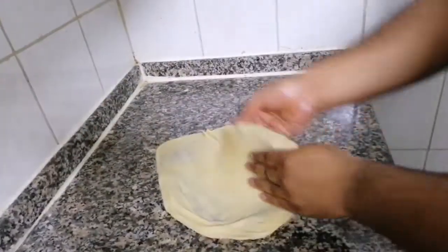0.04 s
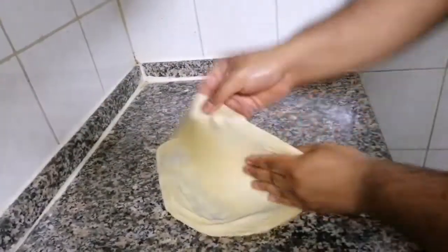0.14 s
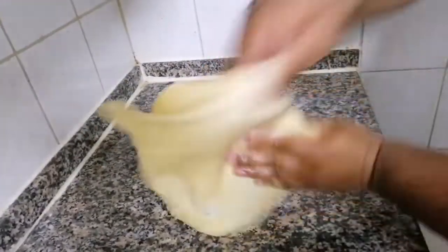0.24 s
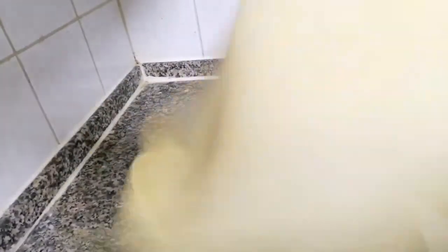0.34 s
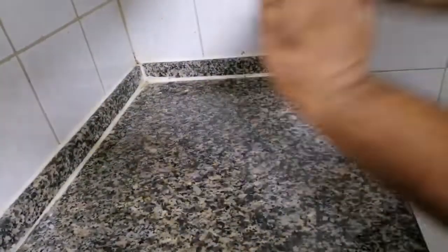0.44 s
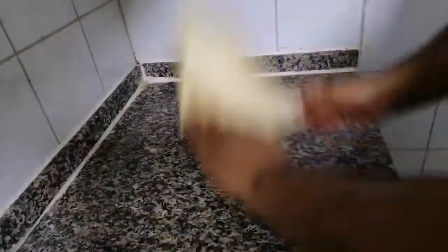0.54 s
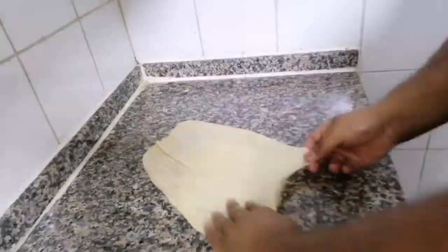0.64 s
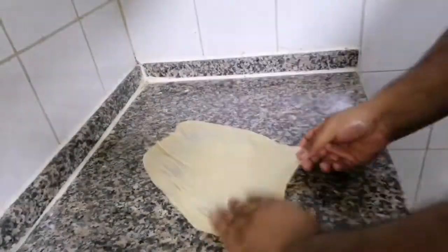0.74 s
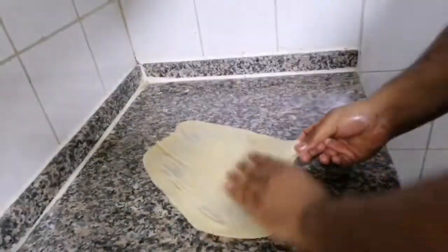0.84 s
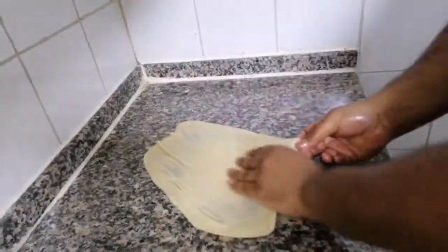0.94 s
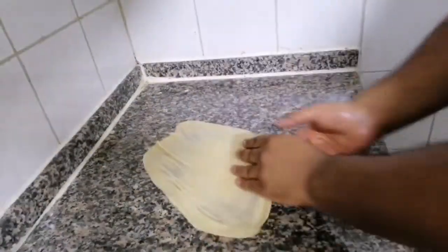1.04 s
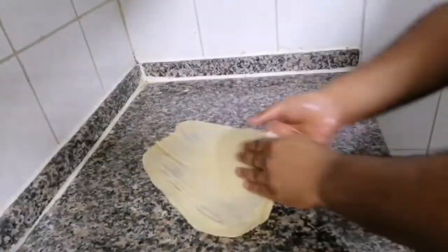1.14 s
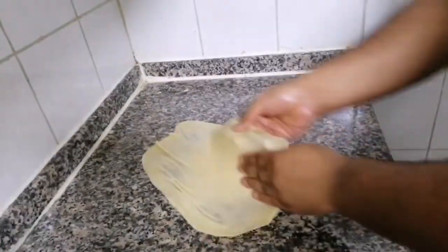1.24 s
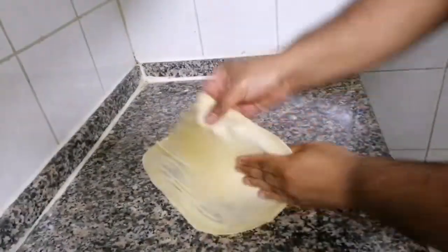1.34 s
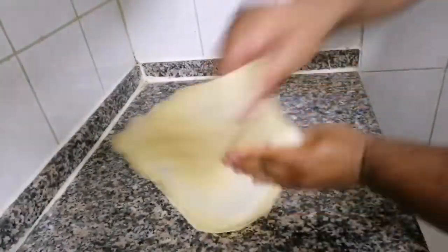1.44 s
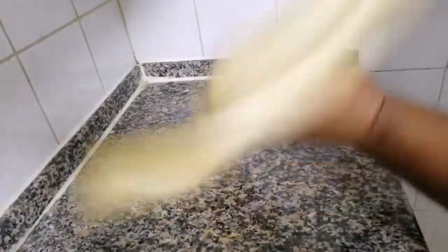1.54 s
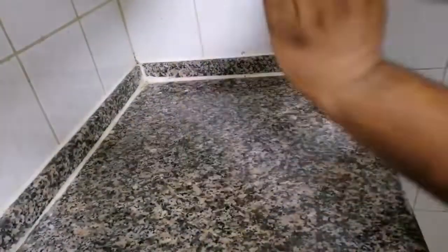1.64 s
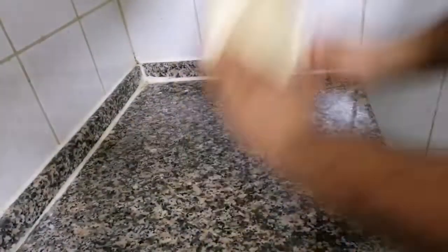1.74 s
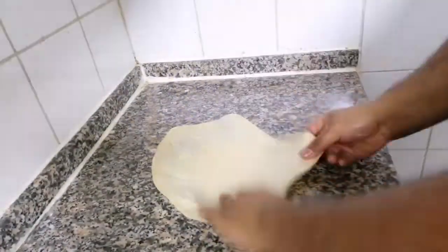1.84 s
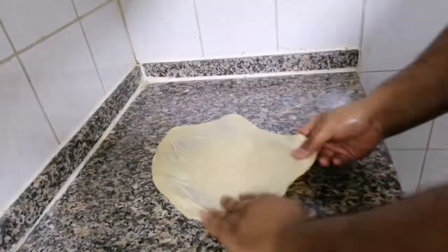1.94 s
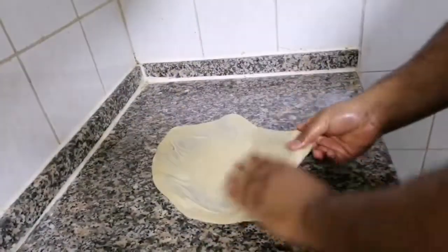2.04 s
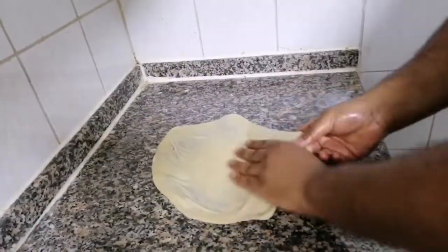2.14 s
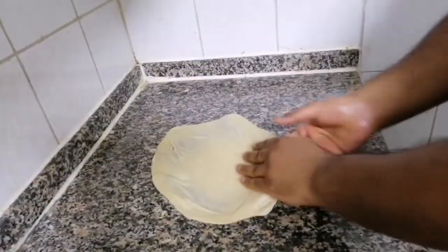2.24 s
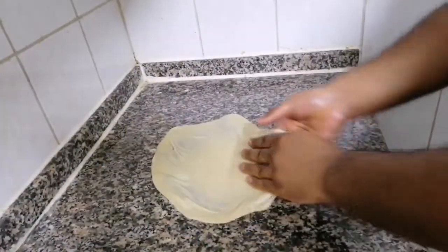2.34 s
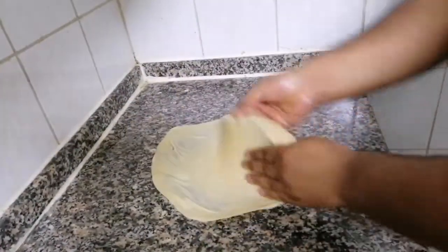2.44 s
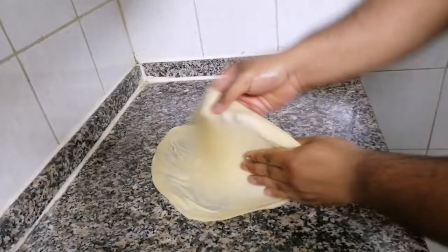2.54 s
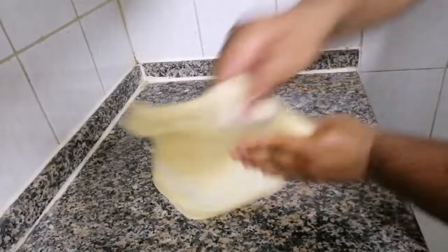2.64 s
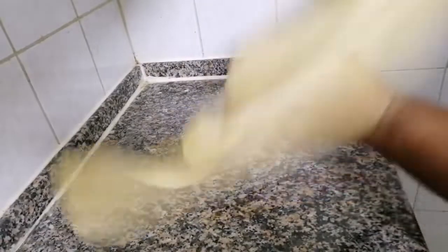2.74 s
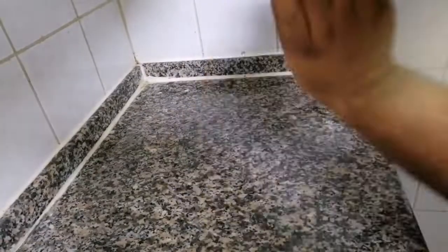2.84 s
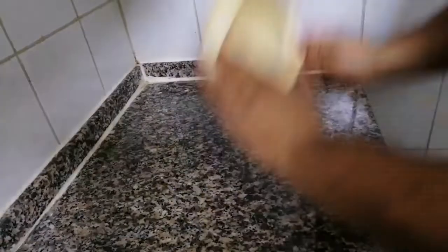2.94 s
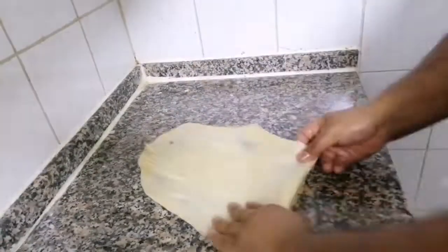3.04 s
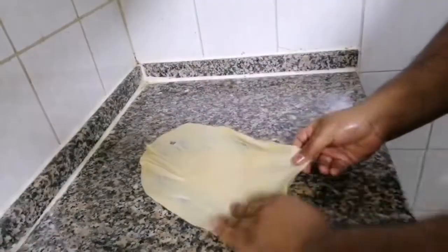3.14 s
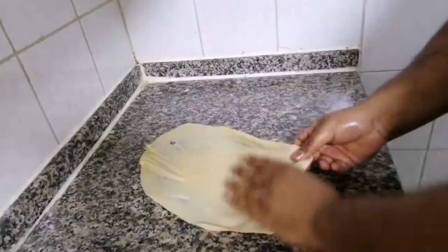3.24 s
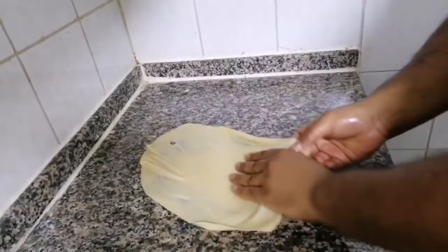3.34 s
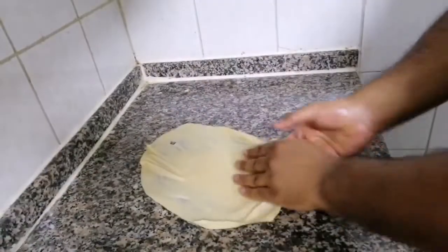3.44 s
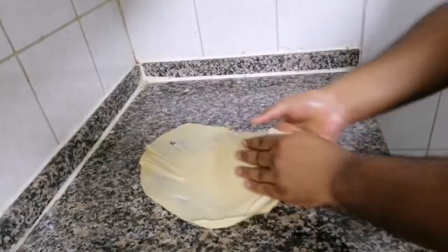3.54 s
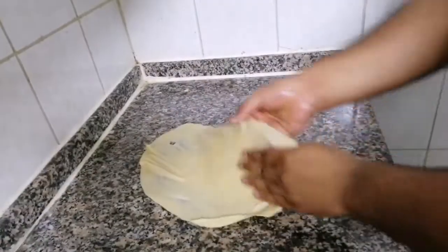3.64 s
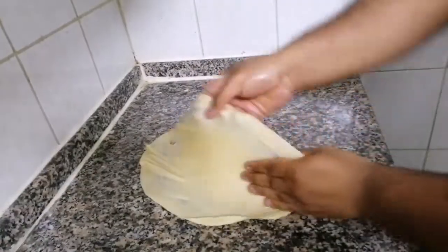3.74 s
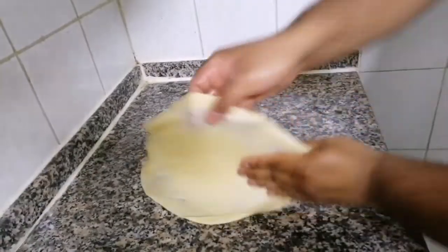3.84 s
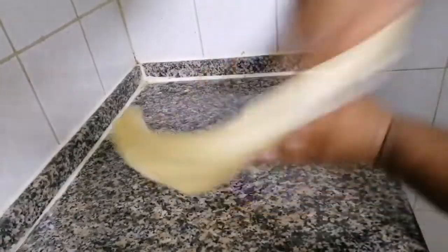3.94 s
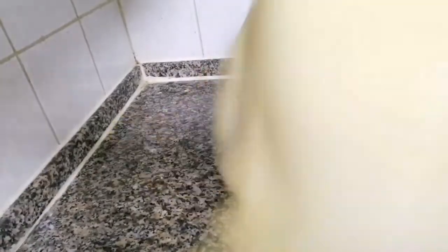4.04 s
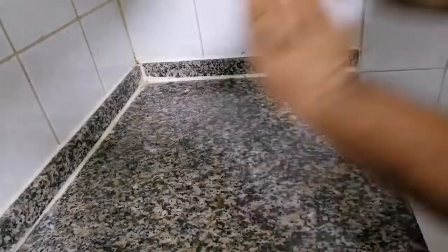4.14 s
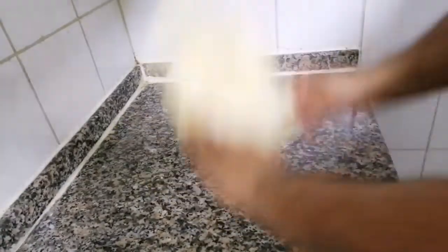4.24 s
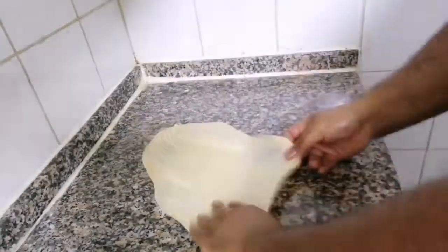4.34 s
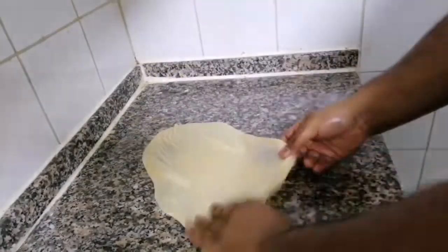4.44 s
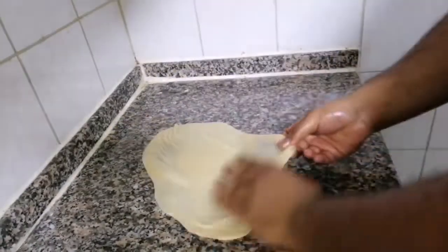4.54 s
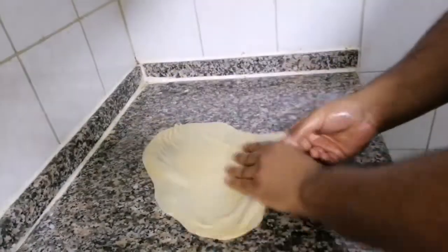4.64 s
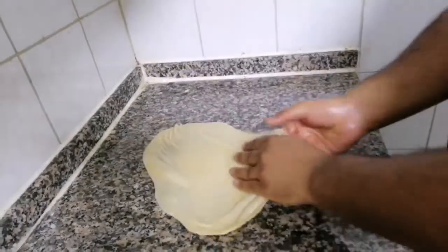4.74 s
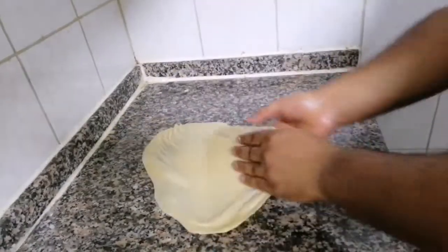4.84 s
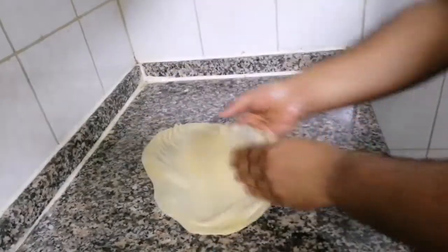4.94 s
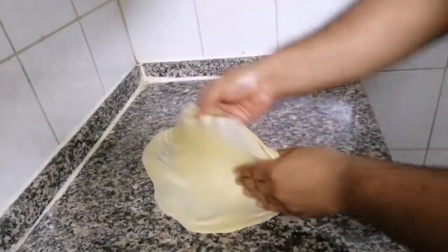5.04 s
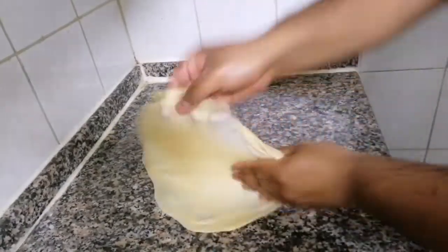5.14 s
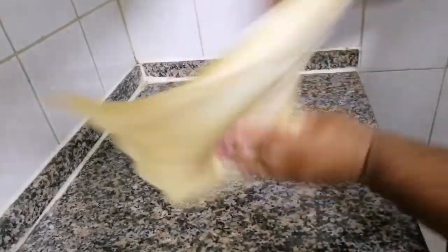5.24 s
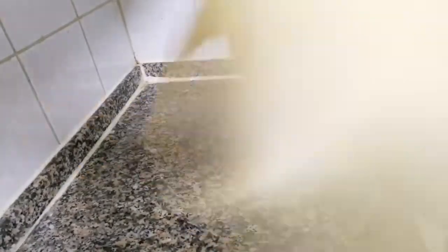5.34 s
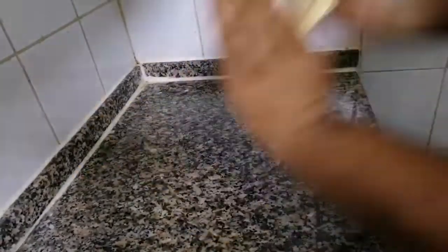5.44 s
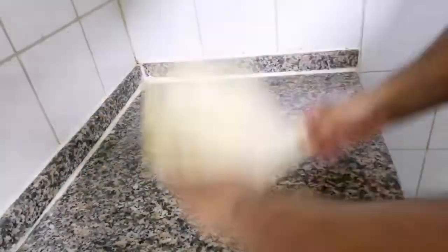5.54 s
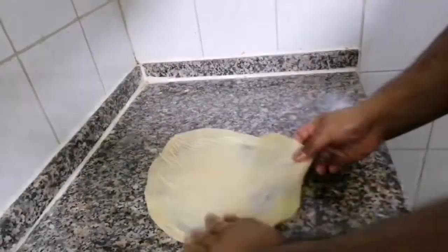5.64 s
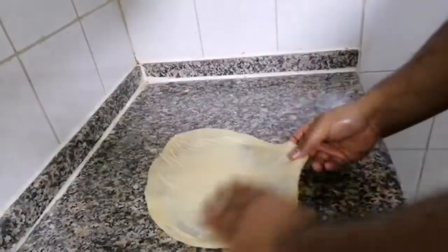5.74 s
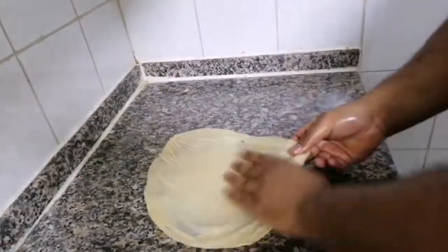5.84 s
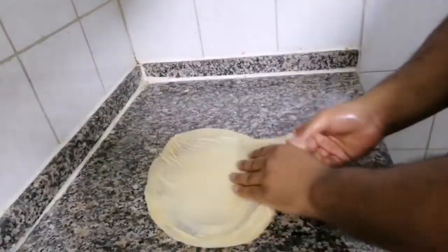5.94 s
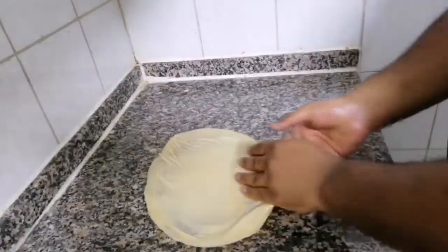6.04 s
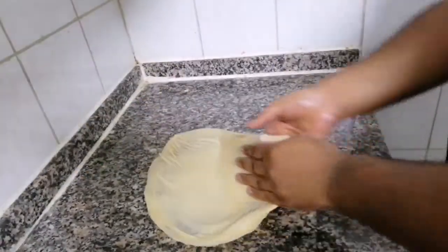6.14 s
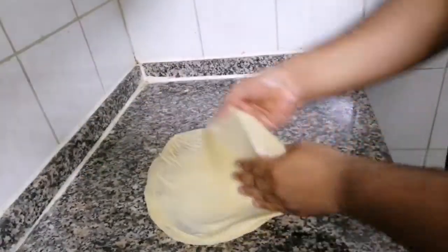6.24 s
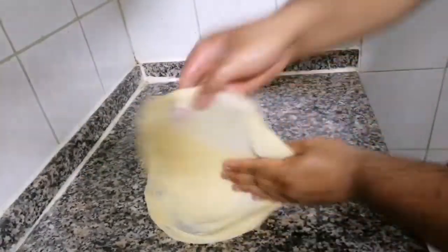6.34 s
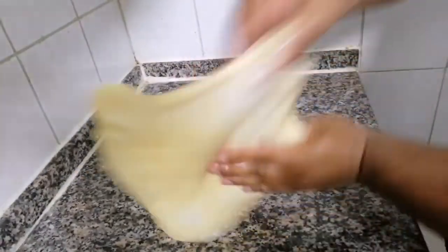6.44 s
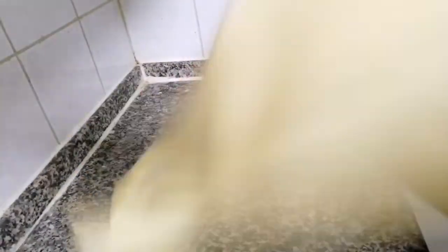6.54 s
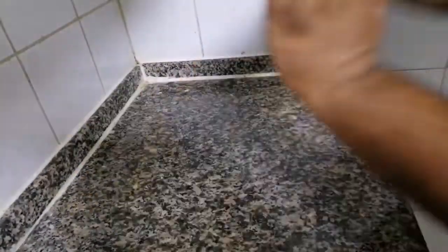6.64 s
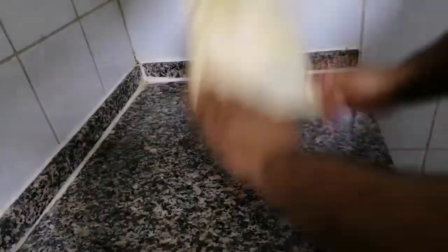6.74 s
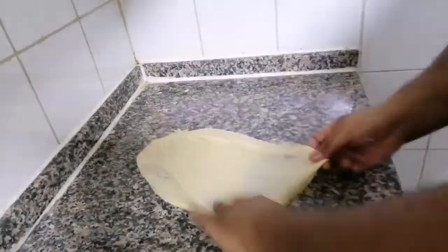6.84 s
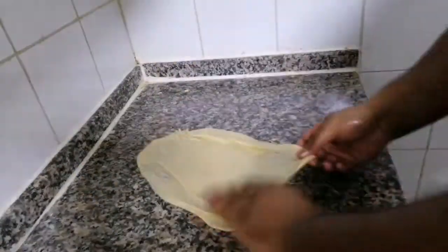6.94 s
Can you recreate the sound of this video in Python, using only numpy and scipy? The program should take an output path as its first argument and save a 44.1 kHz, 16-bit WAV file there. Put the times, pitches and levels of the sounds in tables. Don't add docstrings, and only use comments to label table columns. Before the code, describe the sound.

A thin sheet of soft dough is slapped six times onto a stone counter, loud wet cracks ringing briefly in a tiled kitchen.

```python
import sys
import numpy as np
from scipy import signal
from scipy.fft import rfft, irfft, next_fast_len
from scipy.io import wavfile
from scipy.ndimage import uniform_filter1d, map_coordinates

SR = 44100
rng = np.random.default_rng(int(sys.argv[2]) if len(sys.argv) > 2 else 0)


def voltage_ratio(decibels):
    exponent = np.asarray(decibels, float) / 20
    return 10 ** exponent


def master(y):
    cut = np.clip(np.atleast_2d(y).T, -1, 1)
    pcm = np.round(cut * 32767)
    wavfile.write(sys.argv[1], SR, pcm.astype(np.int16))


N = 308259


def along(points, hz):
    f, v = np.transpose(points)
    return np.interp(np.log(hz + 1), np.log(f + 1), v)


def unit(x):
    return x / np.sqrt(np.mean(x ** 2) + 1e-20)


def curves(rows):
    s, *cols = np.transpose(rows)
    return [np.interp(np.arange(N) / SR, s, c) for c in cols]


def wobble(rate):
    knots = rng.standard_normal(int(N * rate / SR) + 4)
    return map_coordinates(knots, [np.arange(N) * rate / SR])


def filtered(x, response):
    n = x.shape[-1]
    m = next_fast_len(n + 8192)
    return irfft(rfft(x, m) * response(np.fft.rfftfreq(m, 1 / SR)), m)[..., :n]


def peak(f, hz, width):
    return 1j * f * width / (hz * hz - f * f + 1j * f * width)


def add(out, s, x):
    part = out[:, round(s * SR):][:, :x.shape[1]]
    part += x[:, :part.shape[1]]


# frequency in Hz, left-right correlation.
ALIKE = [(60, 0.93), (130, 0.92), (290, 0.75), (640, 0.47), (1410, 0.02), (3100, 0.02), (6820, -0.01),
         (15000, -0.04)]
# frequency in Hz, left over right in dB.
LEAN = [(60, 7.0), (130, 7.5), (290, 5.0), (640, 4.0), (1410, 4.0), (3100, 4.0), (6820, 5.0), (15000, -1.0)]


def kitchen_noise(gain):
    turn = lambda f: np.arccos(np.clip(along(ALIKE, f), -1, 1)) / 2
    spread = lambda f: gain(f) * [np.cos(turn(f)), np.sin(turn(f))]
    common, difference = filtered(rng.standard_normal((2, N)), spread)
    pair = np.array([common + difference, common - difference])
    pair = filtered(pair, lambda f: voltage_ratio(along(LEAN, f) * np.array([[.5], [-.5]])))
    return pair / np.std(pair.mean(0))


# time in seconds, strength in dB.
STREET = [(0, -64), (.2, -61), (.36, -70), (.55, -59), (.95, -61), (1.27, -66.5), (1.46, -54), (1.76, -55),
          (2.4, -59.5), (2.95, -54.5), (3.56, -57), (4.15, -62), (4.72, -65), (4.82, -60.5), (5.5, -62),
          (6.02, -61.5), (6.3, -58), (6.99, -64)]
# frequency in Hz, density in dB per Hz.
RUMBLE = [(12, -40.5), (20, -7), (38, -12), (69, -8), (89, -3.5), (107, 2), (127, -7), (150, -12),
          (220, -22), (290, -53), (480, -120)]
# frequency in Hz, density in dB per Hz.
MURMUR = [(110, -27.5), (180, 1), (344, -11), (383, -17), (418, -6), (469, -10), (575, -4), (607, -18),
          (771, -22.5), (1500, -28.5), (1950, -61), (3300, -120)]
# frequency in Hz, width in Hz, level in dB.
HUMS = [(261.5, 20, -5.5), (417.4, 32, -9), (573.2, 2, -1)]
# time in seconds, level in dB.
DRONE = [
    (1.5, -89),
    (2.1, -70.5),
    (2.4, -82.5),
    (2.62, -64),
    (2.85, -73.5),
    (3.3, -80),
    (4.5, -94.5),
]
# frequency in Hz, density in dB per Hz.
HISS = [(410, -28.5), (700, -0.5), (1300, -9.5), (2070, -9), (4810, -16.5), (8390, -19.5), (9420, -17.5),
        (13700, -27.5), (15400, -30)]
MURMUR_DB, MURMUR_FOLLOWS = -69, 0.47
DRONE_HZ, HISS_DB_RMS = 255, -76.5


def air():
    street_db, = curves(STREET)
    rumble = voltage_ratio(street_db + 0.66 + 1.5 * wobble(9)) * kitchen_noise(lambda f: voltage_ratio(along(RUMBLE, f)))

    modes = lambda f: sum(voltage_ratio(db) * abs(peak(f, hz, width)) for hz, width, db in HUMS)
    swing_db = MURMUR_FOLLOWS * (street_db - street_db.mean())
    murmur_level = voltage_ratio(MURMUR_DB + swing_db + 0.36 * wobble(9.6))
    murmur = murmur_level * kitchen_noise(lambda f: voltage_ratio(along(MURMUR, f)) + modes(f))

    phase = 2 * np.pi * np.cumsum(DRONE_HZ + 3 * wobble(8.2)) / SR
    drone = voltage_ratio(curves(DRONE)[0] + 5.5 + 1.5 * wobble(7.9)) * np.sin(phase) * voltage_ratio([[3], [-4]])
    hiss = voltage_ratio(HISS_DB_RMS + 0.4 * wobble(1.8)) * kitchen_noise(lambda f: voltage_ratio(along(HISS, f)))
    return rumble + murmur + drone + hiss


# start in seconds, peak in dB, resonance in Hz, t60 in seconds, hiss in dB.
RATTLES = [(1.423, -56, 3070, .036, -2), (1.564, -51, 1530, 0.058, -10), (1.568, -54.5, 2640, 0.064, -11),
           (1.68, -62.5, 4000, .053, -10), (5.812, -46, 2370, 0.37, -3.5), (5.84, -52, 5030, 0.14, -11),
           (5.954, -51, 2210, 0.5, -16), (5.97, -44.5, 2390, 0.26, -8), (6.176, -42.5, 1990, 0.25, 3.5),
           (6.194, -43.5, 2510, 0.16, -6.5), (6.374, -57.5, 3000, .12, 2), (6.481, -57.5, 3500, 0.17, -7.5),
           (6.613, -65, 2980, 0.15, 2)]
# frequency in Hz, level in dB, t60 in seconds.
DISHES = [(1883, -0.5, 0.23), (2100, -13, 0.2), (2400, -4.5, 0.94), (2643, -13, 0.35), (2880, -7, 0.46),
          (3560, -10, 0.24), (5130, -12, 0.26), (7640, -16, 0.37)]
DISH_DB, FAR_T60_S = -9.5, .15
RISE_SHARE = 0.017


def crockery(t, hit_t60):
    ring = 0
    for hz, db, mode_t60 in DISHES:
        t60 = min(mode_t60, 1.04 * hit_t60)
        level = voltage_ratio(db + rng.normal(0, 2.8) - 60 * t / t60)
        ring = ring + level * np.sin(2 * np.pi * hz * t + rng.normal(0, 2.4, (2, 1)))
    return voltage_ratio(DISH_DB) * (1 - np.exp(-t / 0.0019)) * ring


def rattles():
    out, t = np.zeros((2, N)), np.arange(SR // 2) / SR
    for s, db, hz, t60, hiss_db in RATTLES:
        if t60 > FAR_T60_S:
            add(out, s, voltage_ratio(db) * crockery(t, t60))
        main = lambda f: peak(f, hz, 0.18 * hz) - voltage_ratio(-6.5) * peak(f, 2 * hz, 0.19 * hz)
        tones = lambda f: main(f) - voltage_ratio(-4.5) * peak(f, 460, 630)
        hiss = lambda f: voltage_ratio(hiss_db - 11.5) * peak(f, 3400, 8600) / (1 + (f / 11000) ** 6)
        noise = unit(filtered(rng.standard_normal((2, len(t))), lambda f: tones(f) + hiss(f)))
        swell = voltage_ratio(db - 4.0 - 60 * t / t60) * (1 - np.exp(-t / (RISE_SHARE * t60)))
        add(out, s, swell * noise * voltage_ratio([[2.2], [-2.2]]))
    return out


# time of the top in seconds, level in dB, rise in seconds.
PEEL = [(.22, -70.5, .13), (1.1, -82, 0.071), (1.441, -65, 0.085), (1.599, -77.5, 0.061),
        (2.28, -82.5, 0.058), (2.632, -65.5, 0.098), (3.878, -69.5, 0.11), (4.85, -81.5, 0.054),
        (5.192, -68.5, .078), (6.3, -71.5, 0.092), (6.46, -67, 0.074)]
# frequency in Hz, density in dB per Hz.
PEEL_TONE = [(410, -32.5), (700, -0.5), (1130, -9.5), (1250, 0), (1520, -9), (1710, -1.5), (2330, -1.5),
             (4340, -9), (9300, -11.5), (13900, -18), (15400, -28)]
FALL_SHARE, PEEL_FLAP_DB = 0.72, -5.5
RUSH_LEAD_S, RUSH_RISE_S = .008, .024
RUSH_DB, RUSH_FLAP_DB = -66, 1.15


def peel():
    s = np.arange(N) / SR
    strokes = [(at, db, rise, PEEL_FLAP_DB) for at, db, rise in PEEL]
    strokes += [(at - RUSH_LEAD_S, RUSH_DB, RUSH_RISE_S, RUSH_FLAP_DB) for at, *_ in LANDINGS]
    hiss_level, flap_level = np.zeros(N), np.zeros(N)
    for at, db, rise, flap_db in strokes:
        side = np.where(s < at, rise, FALL_SHARE * rise)
        swell = voltage_ratio(db) * np.exp(-(abs(s - at) / side) ** 1.9)
        hiss_level += swell
        flap_level += swell * voltage_ratio(flap_db)
    grain = voltage_ratio(0.66 * wobble(28) + 0.44 * wobble(200))
    hiss = hiss_level * kitchen_noise(lambda f: voltage_ratio(along(PEEL_TONE, f)))
    flap = flap_level * kitchen_noise(lambda f: abs(peak(f, 420, 250)))
    return grain * (hiss + flap)


# start in seconds, peak in dB, frequency in Hz, t60 in seconds,
# left-right in dB.
THUDS = [(0.631, -33.5, 59.8, 0.13, 1), (0.64, -38, 290, 0.29, 2.5), (.64, -45, 1082, 0.64, 3.5),
         (.636, -31, 176, 0.077, 3), (5.59, -43.5, 1016, 0.405, 3), (6.849, -33, 135, 0.12, 0.5),
         (1.85, -35, 92, 0.16, 6.5), (1.859, -40.5, 240.6, 0.34, 6), (3.034, -36.5, 83.24, 0.25, 6.5),
         (3.041, -31, 285, 0.26, 8), (4.322, -32, 149, 0.11, 6.5), (4.328, -33.5, 50, .1, 6.5),
         (5.587, -27, 53.8, 0.051, -3.5), (6.848, -28.5, 55, 0.065, 10), (6.852, -40.5, 270, 0.44, 1),
         (6.852, -29, 420, 0.15, 5)]
# start in seconds, peak in dB, frequency in Hz.
KNOCKS = [(0.937, -61, 142.4), (1.057, -46, 71), (1.763, -41.5, 99.7), (3.434, -43, 120.6),
          (4.796, -52.5, 93.5), (6.054, -48, 86), (6.07, -53.5, 236), (1.43, -52.5, 410)]


def knocks():
    out, t = np.zeros((2, N)), np.arange(SR // 3) / SR
    hands = [(*knock, .1, 7) for knock in KNOCKS]
    for s, db, hz, t60, pan_db in list(THUDS) + hands:
        twin = .6 * np.sin(2 * np.pi * 1.13 * hz * t) * (1 - np.exp(-t / .02))
        ring = (np.sin(2 * np.pi * hz * t) + twin) * (1 - np.exp(-t / 0.0019))
        add(out, s, voltage_ratio(db - 60 * t / t60) * ring * voltage_ratio([[pan_db / 2], [-pan_db / 2]]))
    return out


# start in seconds, peak in dB, push (positive) or pull (negative) of about 1.
POPS = [
    (1.8586, -6, -0.5),
    (3.0401, -11, 0.99),
    (6.85, -7, 0.8),
]
POP_S = .00015


def pops():
    out, u = np.zeros((2, N)), np.arange(256) / SR / POP_S
    spike = u * (2 - u) * np.exp(1 - u)
    for s, db, sign in POPS:
        add(out, s, sign * voltage_ratio(db) * spike * voltage_ratio([[2.1], [-2.1]]))
    return out


def puff(db):
    t = np.arange(SR // 4) / SR
    gust = unit(filtered(rng.standard_normal((2, len(t))), lambda f: peak(f, 70, 120) ** 3))
    gust = gust[0] * np.array([[1.1], [-.7]]) + .3 * gust
    return voltage_ratio(db - 9.5 - 60 * t / 0.17) * (1 - np.exp(-t / 0.0033)) ** 2 * gust


# frequency in Hz, t60 in seconds.
TILES = [(100, 0.32), (260, 0.53), (700, 0.49), (1840, 0.41), (4850, 0.38), (12800, 0.26)]
# frequency in Hz, level in dB.
TILE_TONE = [(100, -21.5), (250, -2), (600, -4.5), (1200, -2.5), (3000, -4.5), (7000, -4), (14000, -1)]


def tiles(x):
    hz, t, z = signal.stft(rng.standard_normal((2, int(.7 * SR))), SR, nperseg=256)
    glints = unit(uniform_filter1d(rng.standard_normal(z.shape[1:]), size=24, axis=1))
    decay_db = 60 * t / along(TILES, hz)[:, None]
    level = voltage_ratio(2.4 * glints + along(TILE_TONE, hz)[:, None] - decay_db)
    tail = signal.istft(z * level, SR, nperseg=256)[1]
    tail = tail * (1 - np.exp(-np.arange(tail.shape[1]) / SR / 0.0015)) ** 2
    power = uniform_filter1d(np.mean(np.abs(rfft(x)) ** 2, 0), size=70)
    bins = np.fft.rfftfreq(x.shape[1], 1 / SR)
    colour = lambda f: np.sqrt(np.interp(f, bins, np.abs(power)))
    return filtered(tail / np.linalg.norm(tail[0]), colour) * voltage_ratio([[2.7], [-2.7]])


CRACKLE_T60_S, CRACKLE_SHORTENS = 0.062, 0.58


def patch(db, hz, pan_db):
    t = np.arange(2600) / SR
    t60 = CRACKLE_T60_S * (1000 / hz) ** CRACKLE_SHORTENS
    noise = rng.standard_normal((3, len(t)))
    own = filtered(noise[1:], lambda f: f / (f + 350))
    crackle = (.4 * noise[0] + .95 * own) * voltage_ratio(-60 * t / t60) * (1 - np.exp(-t / .0007))
    ring = np.sin(2 * np.pi * hz * t + rng.normal(0, .6, (2, 1))) * np.exp(-t * hz / 2.1)
    return voltage_ratio(db) * (.9 * crackle + 1.25 * ring) * voltage_ratio([[pan_db / 2], [-pan_db / 2]])


# time in seconds, low body in dB, mid body in dB,
# hiss in dB, room in dB.
LANDINGS = [
    (.635, 3.5, -7, -6.5, -7),
    (1.852, 5.5, -3, -8, -9.5),
    (3.037, 10, 1, -8.5, -10),
    (4.325, 0, 2.5, -5.5, -8.5),
    (5.587, 4, 4, -4.5, -7.5),
    (6.85, 13.5, -10, -2.5, -9.5),
]
# start in seconds, peak in dB, air pocket in Hz, left-right in dB.
PATCHES = [(.6262, -30.5, 890, 0.5), (.632, -27, 1926, 13), (0.6361, -7.5, 2688, 9),
           (.6372, -10, 1039, 6.5), (.638, -10.5, 3800, 5.5), (.642, -14, 1165, -3),
           (1.8475, -24.5, 731, 7.5), (1.8517, -10, 2840, -1.5), (1.8562, -19.5, 983, 17.5),
           (1.858, -8, 2154, 11.5), (3.032, -31.5, 1620, 16.5), (3.041, -20.5, 1574, 7),
           (3.0389, -7, 2070, 6.5), (3.043, -14, 816, 12.5), (3.0485, -17.5, 754, 12.5),
           (4.3213, -32, 878, -3), (4.3246, -16.5, 2260, 10), (4.329, -13, 1866, 11.5),
           (4.332, -14.5, 4000, 9), (4.3325, -13, 726, 2.5), (5.584, -24.5, 5000, 4),
           (5.587, -15.5, 2760, 12), (5.5891, -11, 2440, 0.5), (5.592, -11, 2070, 6.5),
           (5.596, -24, 1300, 6), (6.846, -24.5, 5160, 2), (6.8491, -12, 1530, 12),
           (6.8509, -10.5, 1130, -3), (6.853, -31.5, 460, 4.5), (6.859, -11, 1670, 2)]
# frequency in Hz, width in Hz, level in dB.
POCKETS = [
    [(737.4, 180, 5.5), (1030.3, 420, -3.5), (2640, 29, -5), (3700, 69, 2.5), (4340, 84, -17)],
    [(764, 37, -7), (1110, 30, -0.5), (2800, 150, -2), (3370, 78, -17.5), (3828, 110, 1.5)],
    [(735, 14, -11.5), (813, 12, -5), (1020, 19, -1.5), (1830, 41.4, -20.5), (3800, 38, -15.5)],
    [(746, 21, -6), (1810, 59, -10), (3000, 39, 4), (3800, 110, -5), (4000, 88, -4)],
    [(447, 14, 3), (1810, 36, 6.5), (2050, 33, -10), (2426, 24, -16), (3860, 99, -9)],
    [(425, 9.4, -14.5), (750, 7.3, 9), (1700, 16, -10.5), (2870, 76, 5.5), (3980, 240, 1)],
]
# frequency in Hz, level in dB.
DOUGH = [(60, -36.5), (200, -3), (3800, -3), (10000, -4), (13000, -13), (15500, -27)]
PUSH_DB = -20


def slaps():
    out = np.zeros((2, N))
    for (s, low_db, mid_db, hiss_db, room_db), pockets in zip(LANDINGS, POCKETS):
        start = s - .02
        contact = np.zeros((2, 4096))
        for at, *settings in PATCHES:
            if abs(at - s) < .1:
                add(contact, at - start, patch(*settings))
        (f0, d0), (f1, d1), (f2, d2), *top = DOUGH
        tone = [(f0, d0), (f1, d1 + low_db), (400, low_db), (900, mid_db), (2300, 0), (f2, d2), (6500, hiss_db)]
        tone += [(f, d + hiss_db) for f, d in top]
        contact = filtered(contact, lambda f: voltage_ratio(along(tone, f)))
        hollow = lambda f: 0.54 + sum(voltage_ratio(db - 1.5) * peak(f, hz, w + 45) for hz, w, db in pockets)
        add(out, start, filtered(contact, hollow))
        room = filtered(tiles(contact), lambda f: np.abs(hollow(f)) ** .3)
        add(out, s + .001, voltage_ratio(room_db) * room)
        add(out, s - .004, puff(PUSH_DB))
    return out


SHADE_HZ, SHADE_DB = 11500, 5


def scene():
    side = np.array([[-.5], [.5]])
    shade = lambda f: voltage_ratio(SHADE_DB / (1 + (SHADE_HZ / (f + 1)) ** 6) * side)
    return filtered(slaps() + pops(), shade) + peel() + rattles() + knocks() + air()


def top_cut(x):
    return signal.sosfilt(signal.butter(12, 16200, fs=SR, output="sos"), x)


# start in seconds, depth in dB.
DUCKS = [
    (0.684, -26.5),
    (1.9, -11.5),
    (3.1, -4.5),
    (4.365, -22.5),
    (5.628, -3),
    (6.89, -6),
]
TOP_HZ = 15300
GAIN_DB, DIP_DB = 1.51, -20
DIP_S, DIP_FALL_S, DIP_BACK_S = .716, 0.014, 0.027


def record(dry):
    s = np.arange(N) / SR
    duck_db = sum(db * (s > at) * np.exp(-np.abs(s - at) / 0.086) for at, db in DUCKS)
    bass = filtered(dry, lambda f: 1 / (1 + (f / 230) ** 6))
    ducked = dry + bass * (voltage_ratio(uniform_filter1d(duck_db, size=600)) - 1)
    rounded = ducked / (1 + np.abs(ducked / .72) ** 4) ** (1 / 4)
    side = np.where(s < DIP_S, DIP_FALL_S, DIP_BACK_S)
    dip_db = DIP_DB * np.exp(-np.abs((s - DIP_S) / side) ** 2.6)
    limited = filtered(rounded * voltage_ratio(GAIN_DB + dip_db), lambda f: 1 / (1 + (f / TOP_HZ) ** 70))
    return top_cut(limited)


dry = scene()
out = record(dry)
master(out)
```